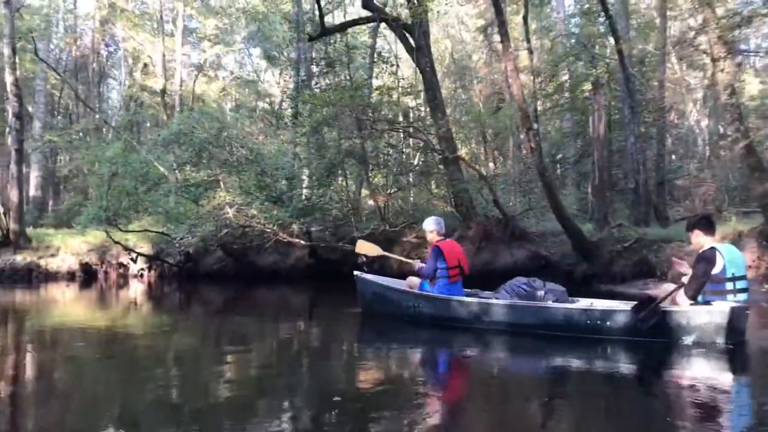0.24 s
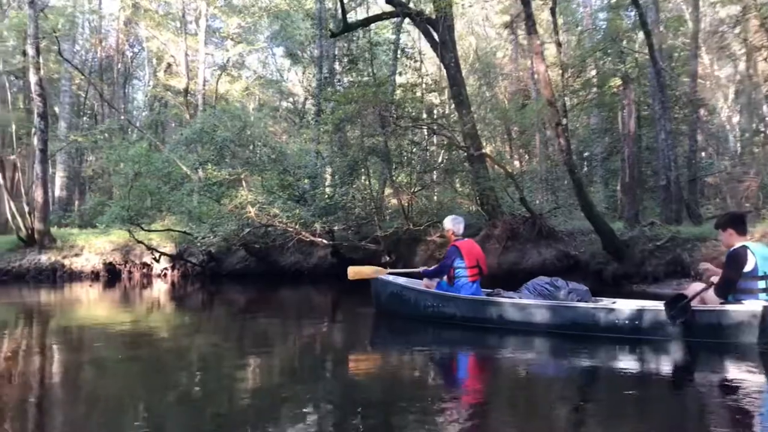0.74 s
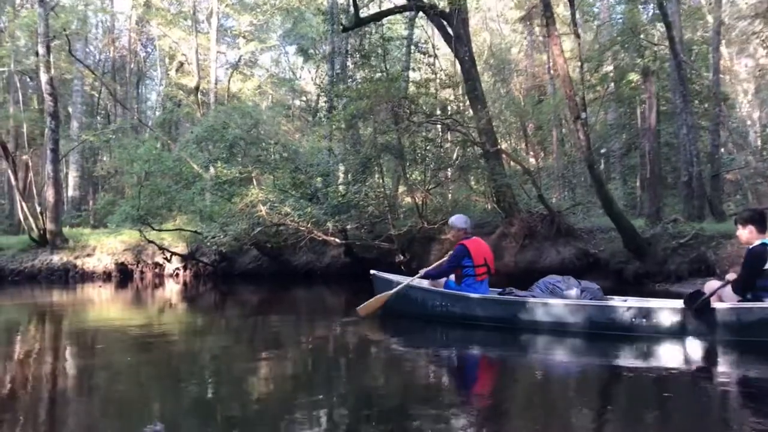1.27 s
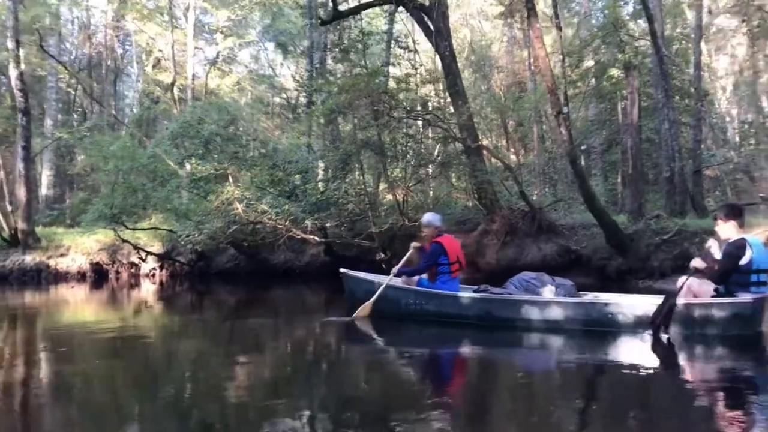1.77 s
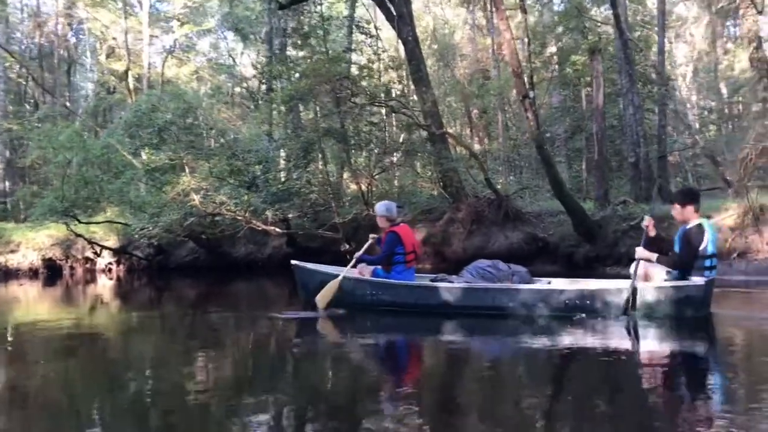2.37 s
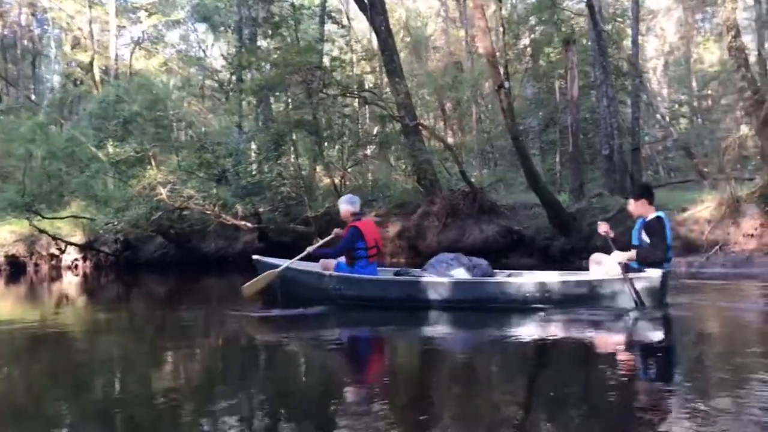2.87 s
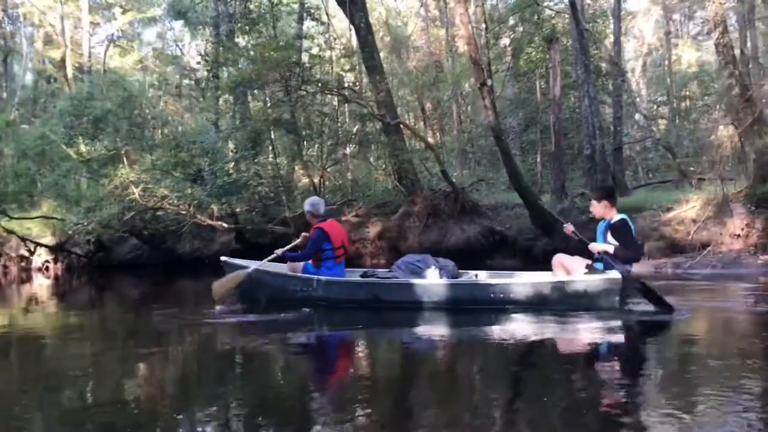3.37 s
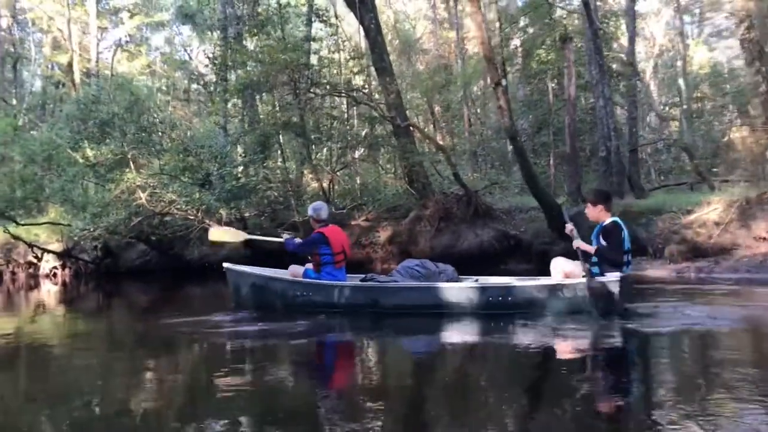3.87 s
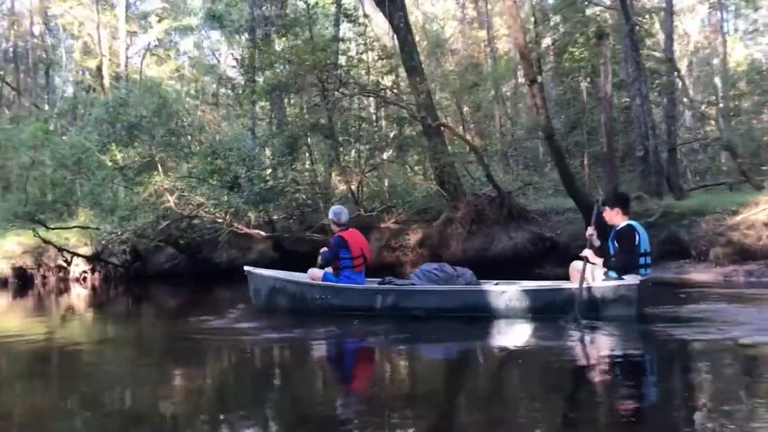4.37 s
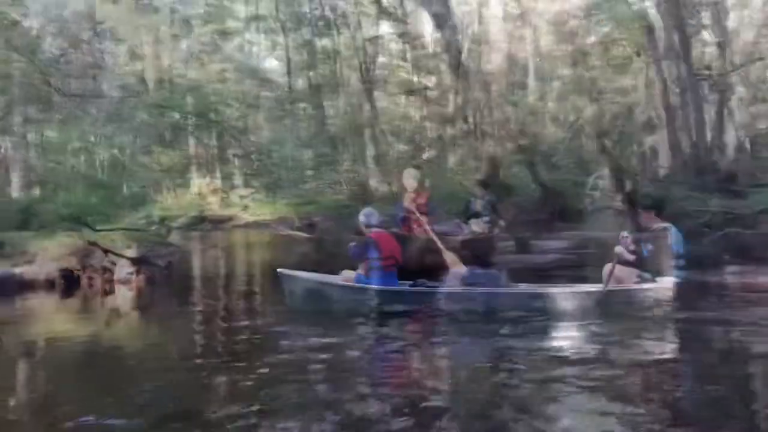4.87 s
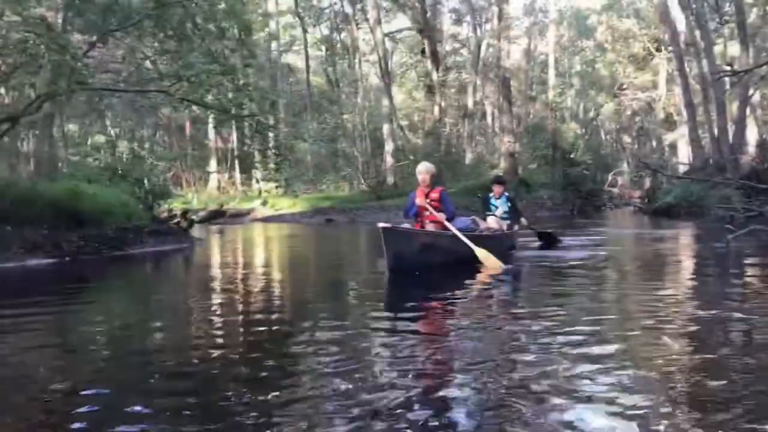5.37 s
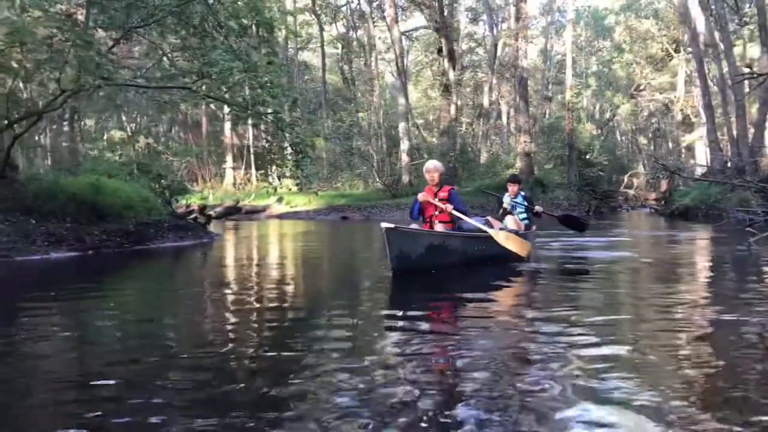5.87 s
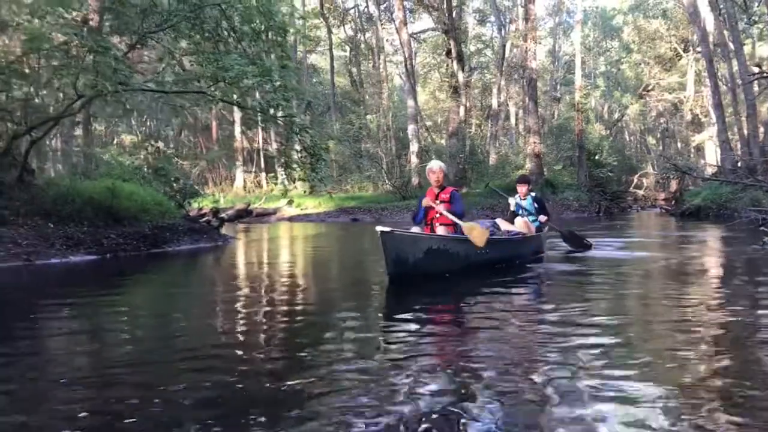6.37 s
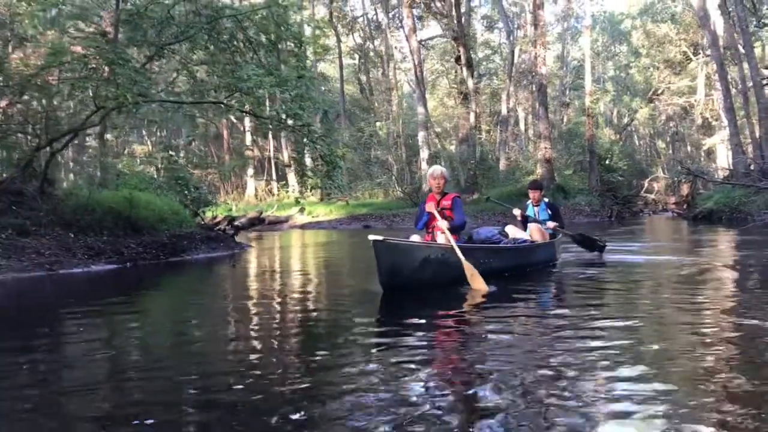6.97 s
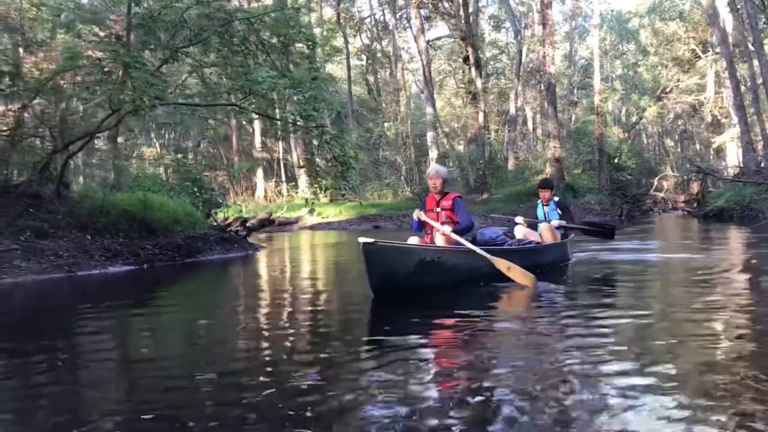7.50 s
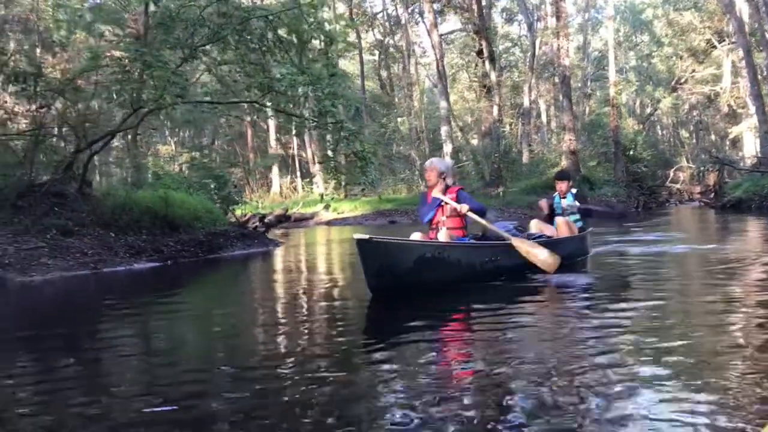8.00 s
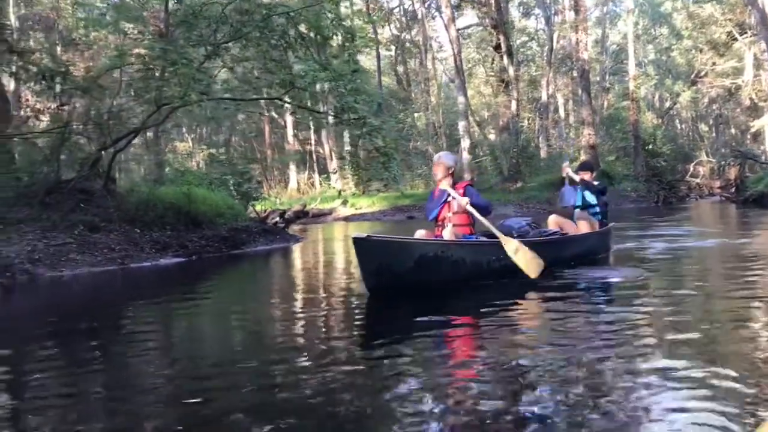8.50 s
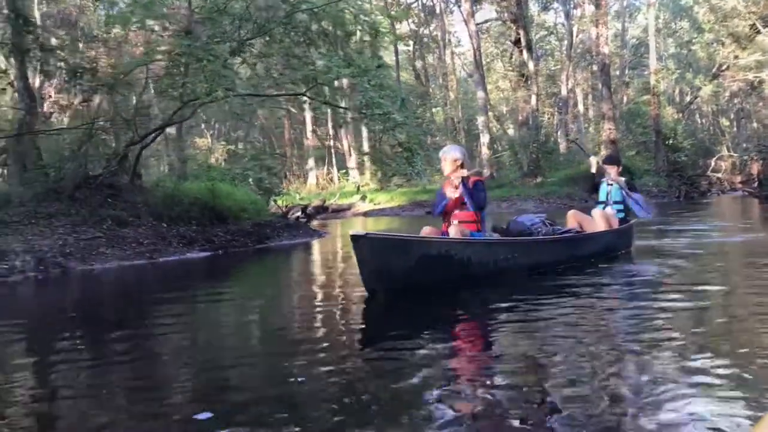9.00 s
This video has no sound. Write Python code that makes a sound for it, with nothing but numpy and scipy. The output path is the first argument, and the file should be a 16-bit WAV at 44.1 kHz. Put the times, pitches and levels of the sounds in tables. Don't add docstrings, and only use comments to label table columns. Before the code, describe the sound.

On a calm forest river, a cricket drone and faint far trill come first over a low rumble. Then a paddle knocks a metal canoe hull and pulls through water with bubbles, gurgles and drips. Birds whistle briefly, a near cricket starts chirping, lighter taps and dips follow, then the hardest hull thud and more dripping. One microphone, with soft scattering from trunks and banks.

```python
import sys
import numpy as np
from scipy import signal
from scipy.fft import rfft, irfft, next_fast_len
from scipy.io import wavfile
from scipy.ndimage import uniform_filter1d, map_coordinates

SR = 44100
rng = np.random.default_rng(int(sys.argv[2]) if len(sys.argv) > 2 else 0)


def file_out(sig):
    cols = np.atleast_2d(sig).T
    lim = np.clip(cols, -1, 1)
    pcm = np.round(lim * 32767).astype(np.int16)
    wavfile.write(sys.argv[1], SR, pcm)


def undo_db(level):
    steps = np.asarray(level, float) / 20
    return 10 ** steps


N = 407925


def unit(x):
    return x / np.sqrt(np.mean(x ** 2) + 1e-20)


def along(points, hz):
    f, v = np.transpose(points)
    return np.interp(np.log(hz + 1), np.log(f + 1), v)


def curves(rows):
    s, *cols = np.transpose(rows)
    return [np.interp(np.arange(N) / SR, s, c) for c in cols]


def wobble(rate):
    coarse = np.arange(0, N + 32, 32)
    knots = rng.standard_normal(int(N * 200 / SR) + 4)
    return np.interp(np.arange(N), coarse, map_coordinates(knots, [coarse * rate / SR]))


def coloured_noise(spectrum):
    m = next_fast_len(N + 8192)
    gain = undo_db(along(spectrum, np.fft.rfftfreq(m, 1 / SR)))
    return unit(irfft(rfft(rng.standard_normal(N), m) * gain, m)[:N])


def band(x, low_hz, high_hz):
    return signal.sosfilt(signal.butter(2, [low_hz, high_hz], "band", fs=SR, output="sos"), x)


def dying(t60s, size):
    hz, t, z = signal.stft(rng.standard_normal(SR), SR, nperseg=size)
    fade = undo_db(-60 * t / along(t60s, hz)[:, None])
    tail = signal.istft(z * fade, SR, nperseg=size)[1][:SR]
    return tail / np.linalg.norm(tail)


def add(track, s, sound):
    place = track[max(round(s * SR), 0):][:len(sound)]
    place += sound[:len(place)]


# (pitch [Hz], time to fall 60 dB [s])
TREES = [(100, 1), (400, 0.49), (2000, 0.076), (5000, 0.73), (12000, 0.56)]


def trees(x, build):
    t = np.arange(SR) / SR
    tail = dying(TREES, size=256) * (1 - np.exp(-(t / build) ** 2))
    return signal.fftconvolve(x, tail)[:N]


# (time [s], rumble level [dB], cricket chorus level [dB])
FOREST = [
    (0.0, -66.5, -51),
    (1.3, -66, -50.5),
    (1.72, -65.5, -50.5),
    (5.3, -67, -52),
    (6.3, -68, -52),
    (9.25, -69, -52),
]
# (pitch [Hz], level [dB per Hz])
RUMBLE = [(15, -47), (25, -31), (48, 0), (96, -1.5), (182, -5), (298, -6.5), (435, -17), (589, -20.5),
          (2300, -28), (2990, -59), (5060, -120)]
# (pitch [Hz], level [dB per Hz])
FROGS = [(1350, -50), (2300, -10.5), (2820, 2), (2970, -2.5), (3340, -0.5), (3630, 6), (4810, -11.5),
         (5300, 1), (6890, -32), (11700, -120)]
# (pitch [Hz], level [dB per Hz])
HISS = [(4470, -21.5), (7600, -17.5), (8450, -17.5), (10400, -23), (12000, -12.5), (12700, -10.5),
        (14400, -23), (15700, -18.5)]
# (pitch [Hz], level [dB per Hz])
HISS_LATER = [(4470, -28), (7600, -24), (7930, -10), (9420, -7.5), (10300, -11.5), (12300, -1),
              (13300, 0.5), (14300, -2), (15700, -1.5)]
# (time [s], level [dB])
KATYDID = [
    (5.2, -75),
    (5.9, -75),
    (6.5, -77),
    (6.8, -74),
    (7.2, -83),
    (9.25, -75),
]


def forest():
    t = np.arange(N) / SR
    rumble_db = curves(FOREST)[0] + 4.07 + 0.9 * wobble(3.19)
    rumble = undo_db(rumble_db) * coloured_noise(RUMBLE)
    leaf_gust = 1.3 * np.exp(-((t - 5.12) / 0.21) ** 2)
    frogs = undo_db(-72 + 1.4 * wobble(5.5) + leaf_gust) * coloured_noise(FROGS)

    later = np.clip((t - 4.6) / 1.2, 0, 1)
    early_hiss = undo_db(-71.0) * (1 - later) ** .5 * coloured_noise(HISS)
    later_hiss = undo_db(-66.0) * later ** .5 * coloured_noise(HISS_LATER)
    hiss = undo_db(1.25 * wobble(70)) * (early_hiss + later_hiss)

    wing_strokes = np.cos(np.pi * 29 * t + .3 * wobble(3)) ** 4
    buzz = rng.standard_normal(N)
    turn = np.clip((t - 5.9) / 0.5, 0, 1)
    low_rasp = band(buzz, 12000, 12500)
    high_rasp = band(buzz, 13750, 14300) + 0.4 * band(buzz, 14700, 15300)
    rasp = (1 - turn) * low_rasp + (0.3 + turn) * high_rasp
    katydid = undo_db(curves(KATYDID)[0]) * later * unit(wing_strokes * rasp)
    return rumble + frogs + hiss + katydid


def chirps(start, end, period, hz, jitter):
    t, out = np.arange(N) / SR, np.zeros(N)
    half = .0145
    stroke = ((t - start) / period + .5 + jitter * wobble(4)) % 1 - .5
    on = (np.abs(stroke * period) < half) & (t > start - period / 2) & (t < end)
    u = stroke[on] * period / half
    tone = np.sin(2 * np.pi * np.cumsum(hz * (1 - .05 * u * u)) / SR)
    out[on] = tone * np.cos(np.pi / 2 * u) ** 0.28 * undo_db(2.3 * wobble(6)[on])
    return out


# (pitch [Hz], level [dB per Hz])
CHORUS = [(2820, -34), (4800, -67), (5150, -19.5), (5550, -7.5), (5650, -4.5), (6060, 6.5), (6280, 3.5),
          (6500, 5), (6980, -7), (7430, -15.5), (8200, -50), (10700, -49), (18000, -120)]
# (first chirp [s], end [s], chirp period [s], wing pitch [Hz], level [dB])
CRICKETS = [
    (4.798, 5.1, .08835, 6680, -51),
    (5.152, 6.96, .08835, 6690, -47.5),
    (7.092, 7.13, .08835, 6690, -48),
    (7.441, 9.25, .0887, 6690, -47.5),
    (5.02, 9.25, 0.11, 6090, -54),
    (5.377, 7.76, 0.0806, 6990, -59.5),
]


def crickets():
    level = undo_db(curves(FOREST)[1] - 1.32)
    draw = rng.random((12, 2))
    crowd = sum(chirps(-b, N / SR, .075 + .02 * b, 5700 + 1100 * a, jitter=0.1024) for a, b in draw)
    drone = 0.83 * coloured_noise(CHORUS) * undo_db(0.21 * wobble(17))
    near = np.zeros(N)
    for start, end, period, hz, db in CRICKETS:
        jitter = .012 + .1 * (hz < 6400)
        near += undo_db(db) * chirps(start, end, period, hz, jitter)
    return level * unit(drone + 0.36 * unit(crowd)) + near


# (first note [s], last note [s], note period [s], middle level [dB], middle pitch [Hz])
TRILL = [
    (0.214, 1.629, 0.0643, -62, 2880),
    (8.281, 8.641, 0.12, -62, 3160),
]


def trill_notes():
    arch_db, arch_hz, scatter_db = 2.5, 150, 1.1
    weak_db = 3.5
    drag, lean = .075, .03
    notes, chance = [], rng.standard_normal((3, 40))
    for (first, last, period, db, hz), luck in zip(TRILL, chance):
        count = round((last - first) / period) + 1
        for k, u in enumerate(np.linspace(-1, 1, count)):
            edge = u * u
            s = first + (last - first) / 2 * (1 + u - (drag * u + lean) * (1 - edge))
            weak = weak_db * (1 + 4 * edge ** 3) * (k % 2) * (period < .1)
            notes.append((s, db - arch_db * edge - weak + scatter_db * luck[k], hz - arch_hz * edge))
    return notes


def trills():
    out, t = np.zeros(N), np.arange(SR // 14) / SR
    for s, db, hz in trill_notes():
        glide = hz * (1.01 - 0.075 * np.exp(-t / 0.0083))
        level = undo_db(db + 5.5 - 60 * t / 0.094) * (1 - np.exp(-t / 0.0066))
        add(out, s, level * np.sin(2 * np.pi * np.cumsum(glide) / SR))
    return out


# (time [s], pitch [Hz], level [dB], buzz [0-1])
BIRDS = [
    [(4.228, 2690, -66, 0.03), (4.24, 3860, -48.5, 0.4), (4.252, 4850, -53, 0.02),
     (4.266, 5210, -51.5, 0.1), (4.279, 4920, -49, 0), (4.29, 3510, -53.5, 0.2), (4.3, 3220, -60, 0.2)],
    [(4.305, 3970, -63, 0.84), (4.335, 4690, -52, 0.93), (4.385, 5160, -51, 0.4), (4.394, 5550, -46, 0.05),
     (4.412, 5545, -43, 0.13), (4.428, 5545, -59, 0.1), (4.458, 5550, -47, 0)],
    [(4.463, 4800, -54, 0.07), (4.468, 3740, -52, 0.15), (4.475, 2470, -58.5, 0.1), (4.484, 1790, -65, 0)],
    [(4.16, 6950, -61, 0.3), (4.172, 7400, -58, 0.2), (4.185, 7600, -68, 0)],
    [(8.35, 2110, -75, 0.13), (8.42, 2250, -70, 0.1), (8.49, 2280, -65, 0.05), (8.515, 2090, -79, 0.2),
     (8.53, 2320, -65, 0.05), (8.6, 2230, -87, 0)],
    [(9.015, 4570, -68, 0), (9.027, 4620, -54, 0.1), (9.036, 4940, -56, 0.3), (9.044, 5570, -66, 0)],
]
ECHO_DB = [-3.5, -11, -6, -6, -15, -29]


def birds():
    t, out, feed = np.arange(N) / SR, np.zeros(N), np.zeros(N)
    for call, echo_db in zip(BIRDS, ECHO_DB):
        hz, db, buzz = curves(call)
        hz = uniform_filter1d(hz, size=300)
        flutter = np.sin(2 * np.pi * 140 * t + 3.55 * wobble(40)) + 0.41 * wobble(150)
        shake = 1 + 0.126 * buzz * flutter
        phase = 2 * np.pi * np.cumsum(hz * shake) / SR
        calling = (t > call[0][0]) * (t < call[-1][0])
        voice = undo_db(db + 5.5) * (np.sin(phase) + 0.015 * np.sin(2 * phase)) * calling
        out += undo_db(-6.0) * voice
        feed += undo_db(echo_db) * voice
    trill = trills()
    return out + trill, feed + undo_db(-4.5) * trill


def bubble(hz, t60, rise):
    t = np.arange(int(min(t60, .3) * SR) + 8) / SR
    tone = np.sin(2 * np.pi * hz * t * (1 + rise * t / t60))
    return tone * undo_db(-60 * t / t60) * (1 - np.exp(-t * hz / 0.7))


def swarm(low_hz, octaves, cycles, spread_db, count):
    out = np.zeros(N)
    for when, pitch, size, life, rise in rng.random((count, 5)):
        hz = low_hz * 2 ** (octaves * pitch)
        sound = bubble(hz, cycles * (0.63 + life) / hz, rise=0.573 * rise ** 2)
        add(out, when * N / SR, undo_db(spread_db * size ** 3) * sound)
    return unit(out)


def mist():
    when, size = rng.random((2, 1400))
    push = undo_db(-7 * np.log(size + 0.006)) * np.sign(size - .5)
    clicks = np.bincount((when * N).astype(int), push, N)
    haze = 1.8 * rng.standard_normal(N) * undo_db(1.9 * wobble(40))
    return unit(band(clicks + haze, 3500, 15400))


# (dip [s], lift [s], gurgle level [dB], dying away [dB/s])
STROKES = [
    (1.746, 3.624, -58, 53),
    (5.4, 5.935, -64.5, 23),
    (6.9, 7.724, -72, 23),
    (7.75, 9.254, -71.5, 30),
]
# (time [s], peak level [dB], half-length [s])
SURGES = [(2.14, -49, 0.03), (2.681, -52, 0.038), (2.908, -51, 0.054), (3.157, -47, 0.12),
          (3.497, -54, 0.044), (3.65, -56.5, 0.039), (4.06, -63.5, 0.11), (4.506, -71, 0.25),
          (5.504, -53.5, 0.14), (5.907, -59.5, 0.038), (6.46, -61, 0.042), (7.377, -55.5, 0.38),
          (7.658, -51, 0.059), (8.072, -57.5, 0.081)]


def stir_level():
    t = np.arange(0, N + 64, 64) / SR
    dip_db_per_s, surge_db = 142, 8
    power = np.zeros(len(t))
    for dip, lift, db, fade in STROKES:
        growing = dip_db_per_s * np.maximum(dip - t, 0)
        power += undo_db(db - growing - fade * np.maximum(t - lift, 0)) ** 2
    for s, db, half in SURGES:
        power += undo_db(db - surge_db * np.abs(t - s) / half) ** 2
    return np.interp(np.arange(N) / SR, t, np.sqrt(power))


# (time [s], peak level [dB], pitch [Hz])
DRIPS = [(1.764, -34, 1120), (1.859, -32, 1034), (2.075, -41, 820), (2.117, -41, 830), (2.155, -35.5, 607),
         (2.212, -38.5, 774), (2.246, -36.5, 1026), (2.389, -45, 1120), (2.711, -42.5, 890),
         (2.757, -42, 600), (2.91, -40, 750), (2.934, -38, 622), (3.131, -31.5, 1360), (3.132, -40, 880),
         (3.133, -33.5, 1710), (3.168, -33, 1226), (3.24, -36.5, 1170), (3.409, -40, 750),
         (3.655, -38, 1116), (5.442, -43, 714), (5.467, -40.5, 870), (5.548, -40.5, 1570),
         (5.65, -43.5, 1370), (6.971, -42, 613), (7.216, -42, 1610), (7.404, -26.5, 1583),
         (7.529, -42.5, 613), (7.691, -43, 1014),
         (1.857, -34.5, 1550), (2.457, -43, 2430), (2.541, -44, 2290), (2.9327, -39.5, 1960),
         (3.1971, -45, 2780), (3.2967, -40.5, 1880), (3.746, -45, 1720), (3.808, -47.5, 2380),
         (3.981, -47, 1940), (4.055, -43.5, 1350), (4.076, -42.5, 3040), (4.322, -43, 3520),
         (4.344, -52, 2130), (4.35, -59, 1250), (4.365, -54, 1420), (4.546, -54, 1820), (4.757, -57, 1614),
         (4.844, -53, 2000), (7.115, -56, 4500), (7.133, -51, 3800), (7.666, -45, 4600), (1.712, -46, 4460),
         (4.509, -51, 1165), (4.572, -48, 2010), (5.035, -52, 2220), (5.301, -49, 1870), (5.946, -42, 3030),
         (5.9683, -45, 4570), (7.285, -45, 3340), (7.5022, -43, 3200), (7.574, -41, 2330),
         (7.658, -44, 2800), (8.009, -45.5, 1170), (8.039, -48, 1050), (8.16, -49, 796), (8.771, -51, 1050),
         (6.02, -57, 780), (6.47, -55, 1140)]


def drips():
    out, events = np.zeros(N), DRIPS
    rises = 0.0091 + 0.36 * rng.random(len(events)) ** 2
    for (s, db, hz), rise in zip(events, rises):
        rise = rise * (db < -34)
        t60 = 0.034 * (1000 / hz) ** 0.4
        add(out, s, undo_db(db + 0.5) * bubble(hz * (1 - 0.3 * rise), t60, rise))
    return out


# (time [s], peak level [dB], pitch [Hz], rise [0-1])
TRICKLE = [(1.937, -39, 740, 0.4), (2.034, -44, 1890, 0.05), (2.102, -51, 746, 0.1),
           (2.136, -38, 695, 0.25), (2.267, -35.5, 1040, 0.06), (2.281, -39, 1660, 0.07),
           (2.307, -38, 844, 0.36), (2.323, -39, 1210, 0.3), (2.361, -41, 1170, 0), (2.423, -43, 1040, 0.3),
           (2.445, -46, 1680, 0.1), (2.504, -42, 1270, 0.03), (2.592, -53, 720, 0.1), (2.636, -45, 850, 0),
           (2.654, -44, 1500, 0), (2.701, -32, 2020, 0.02), (2.792, -43, 950, 0.1),
           (2.818, -36.5, 870, 0.26), (2.847, -36, 740, 0.04), (2.892, -41, 740, 0),
           (3.006, -46, 950, 0.05), (3.035, -40, 1050, 0), (3.074, -36, 1540, 0.1), (3.222, -33, 1570, 0.2),
           (3.46, -45, 960, 0.3), (3.496, -52, 1110, 0.1), (3.585, -39, 1160, 0.3), (3.632, -40, 820, 0.2),
           (3.877, -50, 1550, 0.2), (5.24, -49, 1300, 0), (5.399, -55, 1610, 0.2), (5.413, -66, 850, 0.2),
           (5.508, -42, 670, 0), (5.619, -49, 2100, 0.2), (6.096, -50, 1120, 0), (6.164, -50, 988, 0.03),
           (6.983, -45, 1060, 0.1), (7.131, -43, 1010, 0.1), (7.252, -39, 665, 0), (7.278, -43, 1630, 0),
           (7.502, -38, 975, 0.03), (7.577, -39, 613, 0.15), (7.601, -40, 1710, 0.06),
           (7.622, -41, 610, 0.17), (7.639, -45, 1400, 0.3), (7.773, -42, 1600, 0.2),
           (7.818, -60, 1010, 0.1), (7.874, -55, 970, 0), (7.929, -49, 920, 0.24), (8.084, -47, 1500, 0)]
# (time [s], peak level [dB], pitch [Hz])
PRICKS = [(1.7115, -35, 1900), (1.9696, -33, 2480), (2.2887, -44, 2190), (2.3344, -52, 3670),
          (2.4803, -36, 3470), (2.5122, -49, 2530), (2.5935, -42, 3500), (2.6387, -40, 3100),
          (2.6633, -42, 3860), (2.7422, -41, 4370), (2.7711, -44, 3730), (2.8669, -51, 3540),
          (2.953, -35, 3780), (2.9701, -45, 3530), (3.6565, -37, 1880), (4.0228, -56, 2190),
          (4.0516, -41, 4240), (4.1445, -49.5, 2280), (4.5444, -47, 4430), (4.6543, -46, 2980),
          (4.6767, -46.5, 2400), (4.7586, -49, 3240), (4.8439, -50, 2840), (5.51, -42, 1830),
          (5.5777, -41, 4300), (5.5887, -44, 3640), (5.6594, -48, 4240), (5.7618, -44, 4430),
          (5.8232, -41, 3030), (5.901, -42, 3560), (6.0342, -46, 2640), (6.9433, -38, 3770),
          (7.1144, -51, 2000), (7.1344, -47, 1960), (7.521, -42, 2850), (7.5547, -41, 3400),
          (7.6211, -38.5, 2350), (7.6664, -45, 1930), (7.7009, -51, 2900), (7.7573, -60, 1870),
          (7.8191, -49, 2930), (7.9049, -59, 2800), (8.0157, -42, 2990), (8.2197, -43, 3570),
          (8.315, -45, 3560)]


def trickle():
    out = np.zeros(N)
    for s, db, hz, rise in TRICKLE:
        add(out, s, undo_db(db - 6.0) * bubble(hz, 0.041 * (1000 / hz) ** 0.26, rise))
    for s, db, hz in PRICKS:
        add(out, s, undo_db(db - 4.0) * bubble(hz, 45 / hz, rise=0.068))
    return out


# (time [s], peak level [dB], pitch [Hz], time to fall 60 dB [s])
GULPS = [(1.2945, -42, 662, 0.035), (1.308, -46, 570, 0.046), (1.326, -56, 716, 0.06),
         (1.625, -50, 1300, 0.09), (2.495, -53, 447, 0.11), (2.61, -68, 600, 0.093), (3.24, -49, 396, 0.15),
         (3.265, -46.5, 325, 0.12), (3.3, -48, 250, .1), (2.2, -50.5, 277, 0.114), (3.53, -49, 513, 0.097),
         (3.982, -53.5, 557, 0.062), (8.035, -48, 734, 0.09), (2.857, -35, 342, 0.098),
         (3.096, -45, 404, 0.091), (3.299, -44, 214, 0.26), (3.386, -36, 286, 0.084),
         (4.894, -44, 885, 0.053), (5.262, -38, 345, 0.063), (5.671, -47, 367, 0.13),
         (7.46, -40, 199, 0.069), (7.795, -49.5, 241, 0.093)]
# (time [s], peak level [dB], first pitch [Hz], length [s])
BLOOPS = [(2.392, -49, 950, 0.023), (4.041, -64, 610, 0.019), (4.482, -63.5, 570, 0.033),
          (5.79, -52, 840, 0.023), (5.917, -57, 900, 0.023), (6.2, -67, 473, 0.063),
          (6.434, -59, 1720, 0.022), (7.009, -43, 1615, 0.0085), (7.084, -43, 860, 0.0166),
          (7.148, -51.5, 582, 0.03), (7.174, -46, 950, 0.021), (7.352, -48, 584, 0.032)]


def air_pockets():
    out = np.zeros(N)
    for s, db, hz, t60 in GULPS:
        add(out, s, undo_db(db - 2.0) * bubble(hz, t60, rise=0.17))
    climb = 0.764
    for s, db, hz, length in BLOOPS:
        u = np.arange(int(length * SR)) / (length * SR)
        tone = np.sin(2 * np.pi * hz * length * u * (1 + climb * u / 2))
        add(out, s, undo_db(db) * np.sin(np.pi * u ** 0.5) * tone)
    return out


# (time [s], peak level [dB], body
# level [dB])
TICKS = [(1.679, -41, 8), (0.464, -64, -3), (1.597, -58, 3), (4.617, -51, 2), (3.527, -42, -14),
         (2.1887, -45, -9), (2.4049, -41, -23), (2.461, -36, -4), (2.543, -39.5, 2), (2.7434, -39, -10),
         (3.0055, -41, -14), (3.048, -44, 2), (3.1447, -38, 3), (3.169, -39, 1), (3.24, -46.5, 10),
         (3.493, -43, -12), (3.514, -29, -17), (3.647, -35, -3), (3.915, -41, -11), (4.3288, -41.5, -6),
         (5.5428, -56, -6), (5.715, -37.5, -9), (5.74, -44.5, 0), (7.175, -44, -1), (7.7508, -39, -18),
         (8.017, -44, -2.5), (8.038, -36, -13), (8.7694, -55.5, 9.5)]


def spray_ticks():
    out, t = np.zeros(N), np.arange(SR // 20) / SR
    for s, db, body_db in TICKS:
        high = rng.standard_normal(len(t)) * undo_db(-60 * t / .006)
        body = rng.standard_normal(len(t)) * undo_db(-60 * t / .03)
        click = band(high, 5500, 15700) + undo_db(body_db + 7.5) * band(body, 840, 5800)
        add(out, s, undo_db(db - 7.0) * click)
    return out


# (pitch [Hz], level [dB per Hz])
GURGLE = [(250, -9), (420, 3.5), (472, 7.5), (601, -11), (1390, -3), (1570, -4.5), (5200, -23.5),
          (6760, -37), (11400, -120)]


def water():
    clumps = undo_db(4.7 * np.tanh(wobble(32)))
    gurgle = swarm(low_hz=540, octaves=2.0, cycles=32, spread_db=7, count=2300)
    fizz = swarm(low_hz=1800, octaves=1.45, cycles=34, spread_db=7, count=2300)
    wash = coloured_noise(GURGLE)
    froth = band(clumps * (gurgle + .5 * fizz + 0.78 * wash), 730, 6400)
    stirred = stir_level() * (undo_db(0.5) * unit(froth) + undo_db(-15) * mist())
    wet = stirred + drips() + trickle() + air_pockets() + spray_ticks()
    return wet - 0.46 * band(wet, 9540, 11450)


# (pitch [Hz], time to fall 60 dB [s])
DAMPING = [(60, 1), (250, 0.53), (500, 0.25), (1500, 0.12), (3000, 0.029)]


def panel_ring(panels):
    t = np.arange(SR) / SR
    builds = (1 - np.exp(-(t / .014) ** 2)) * np.clip(4 - 5 * t, 0, 1)
    gain = undo_db(along(panels, np.fft.rfftfreq(SR, 1 / SR)))
    ring = irfft(rfft(dying(DAMPING, size=512)) * gain, SR)
    return builds * ring / np.sqrt(np.mean(ring[:SR // 20] ** 2))


def hull(blows, panels, struts):
    out, t = np.zeros(N), np.arange(SR) / SR
    for s, db, crack_db, ring_db, hz in blows:
        glide = hz * (.82 + .75 * np.exp(-t / .006))
        swell = (t / .008) ** 3.2 * np.exp(3.2 - 3.2 * t / .008)
        thud = np.sin(2 * np.pi * np.cumsum(glide) / SR) * swell

        body, edge = rng.standard_normal((2, SR))
        bright = undo_db(np.clip(0.21 * (db + 32), -9, 3))
        crack_fade = undo_db(-60 * t / 0.035) + 0.2 * undo_db(-60 * t / 0.23)
        crack = band(band(body, 290, 3340), 140, 6000 * bright) * crack_fade
        crack += 0.13 * bright * band(edge, 5700, 14000) * undo_db(-60 * t / 0.023)
        for f, level, t60 in struts:
            crack += 0.37 * undo_db(level - 60 * t / t60) * np.sin(2 * np.pi * f * t)
        crack *= 1 - np.exp(-t / 0.0014)

        knock = thud + undo_db(crack_db + 13.5) * crack + undo_db(ring_db) * panel_ring(panels)
        add(out, s, undo_db(db + 0.85) * knock)
    return out


# (time [s], peak level [dB], crack [dB], ring [dB], thud pitch [Hz])
FIRST = [
    (1.682, -26.5, -11.5, -4, 208),
    (1.786, -35, -13.5, -1.5, 210),
    (1.809, -40.5, -9.5, -16, 193),
]
# (time [s], peak level [dB], crack [dB], ring [dB], thud pitch [Hz])
SECOND = [
    (1.959, -28.5, -19.5, -13, 298),
    (4.863, -32, -20, -12.5, 270),
    (4.896, -51, -22, -17, 235),
    (5.006, -41.5, -28, -11.5, 263),
    (5.257, -36.5, -26, -16, 182),
    (6.8175, -16, -20, -19, 278),
    (6.932, -27, -23.5, -16, 268),
    (6.971, -43, -14.5, -16, 260),
]
# (pitch [Hz], level [dB per Hz])
HULL_A = [(24, -46), (40, -29), (65, -1.5), (134, -7), (170, -0.5), (239, -3), (281, -7), (520, -1),
          (774, -14), (1090, -6.5), (1380, -11), (3000, -26), (3900, -64), (6600, -120)]
# (pitch [Hz], level [dB per Hz])
HULL_B = [(24, -49), (40, -19), (102, -12.5), (175, -3.5), (257, 3.5), (337, -8), (450, -13), (1030, -15),
          (1220, -25), (1330, -7.5), (1940, -21), (3000, -34), (3900, -73), (6600, -120)]
# (pitch [Hz], level over crack [dB], time to fall 60 dB [s])
STRUTS_A = [(148, -7, 0.3), (326, 8, 0.09), (534, 14.5, 0.032), (1050, 5, 0.023)]
# (pitch [Hz], level over crack [dB], time to fall 60 dB [s])
STRUTS_B = [(185.6, 0, 0.23), (1500, 2, 0.027), (1120, 9, 0.024), (2000, -1, 0.028)]


def knocks():
    return hull(FIRST, HULL_A, STRUTS_A) + hull(SECOND, HULL_B, STRUTS_B)


def scene():
    knocking, stir = knocks(), water()
    song, far_song = birds()
    near_echo = trees(undo_db(-23.5) * knocking + undo_db(-5.5) * stir, build=0.0071)
    far_echo = undo_db(7.5) * trees(far_song, build=0.029)
    mono = forest() + crickets() + song + near_echo + far_echo + stir + knocking
    return np.array([mono, mono])


def top_cut(x):
    return signal.sosfilt(signal.butter(12, 15820, fs=SR, output="sos"), x)


def record(dry):
    return top_cut(dry)


dry = scene()
out = record(dry)
file_out(out)
```